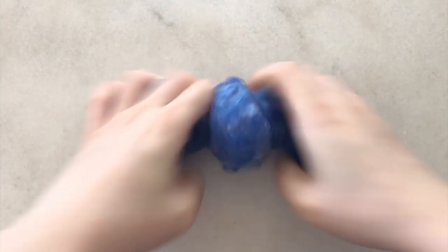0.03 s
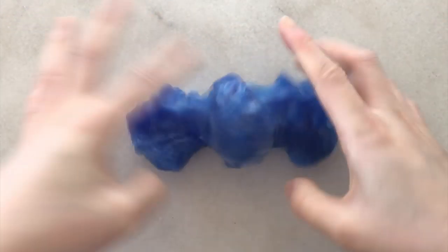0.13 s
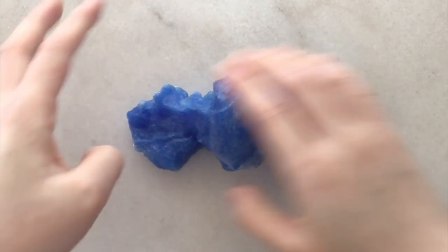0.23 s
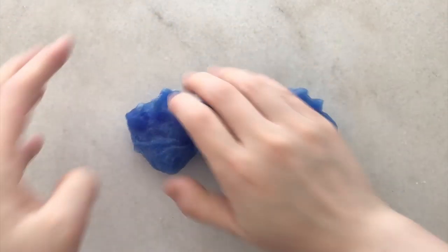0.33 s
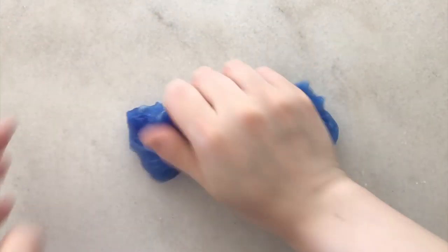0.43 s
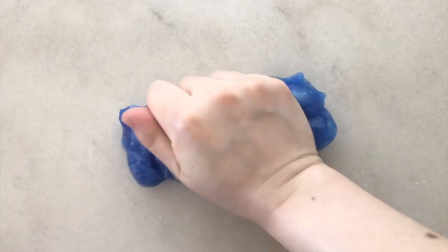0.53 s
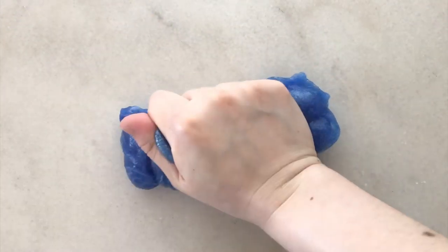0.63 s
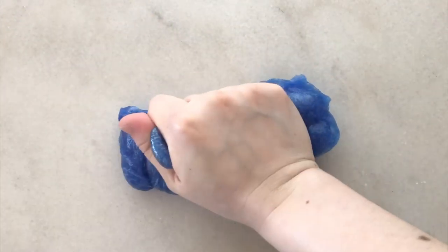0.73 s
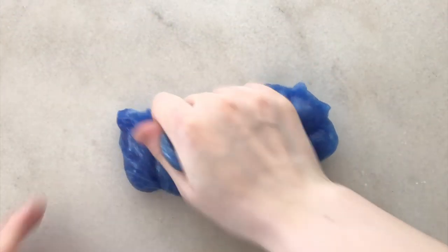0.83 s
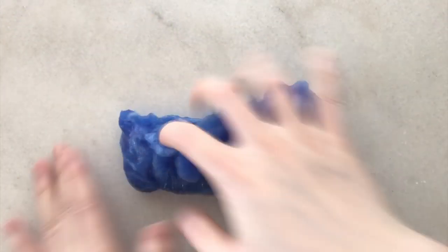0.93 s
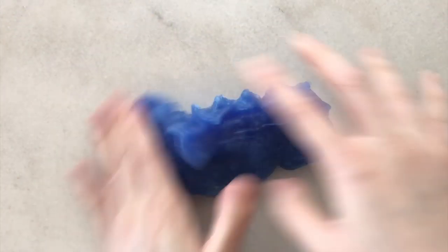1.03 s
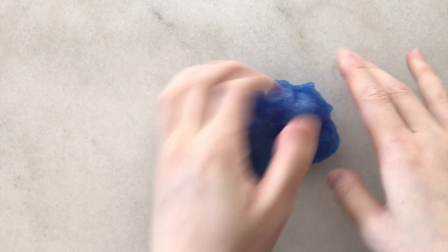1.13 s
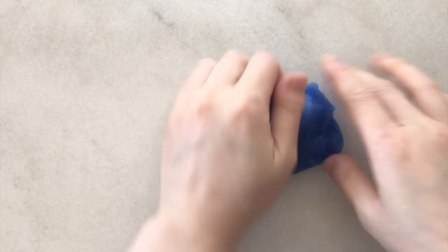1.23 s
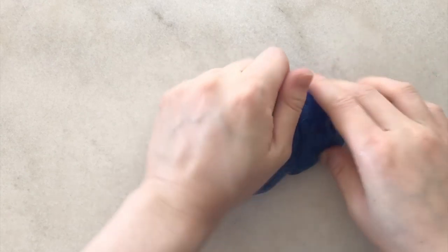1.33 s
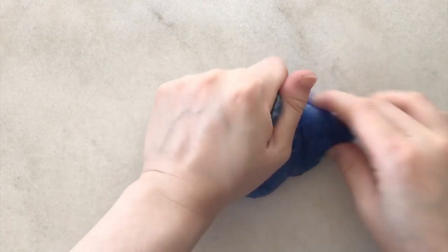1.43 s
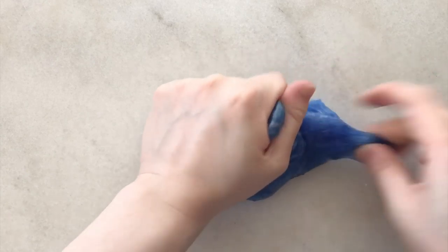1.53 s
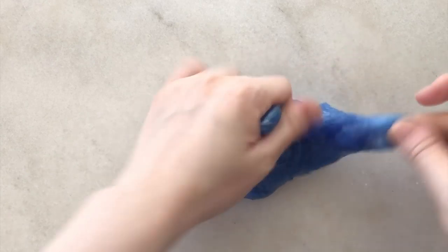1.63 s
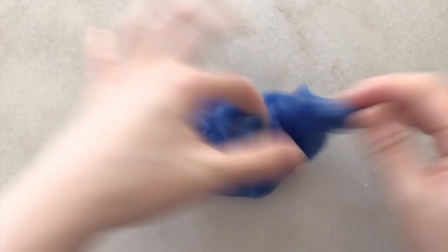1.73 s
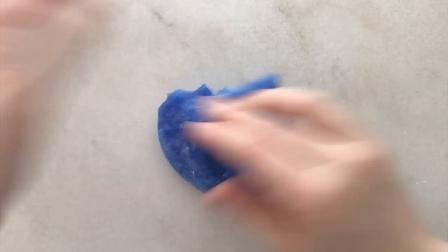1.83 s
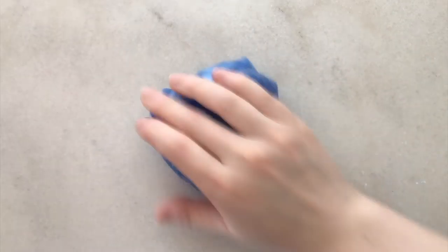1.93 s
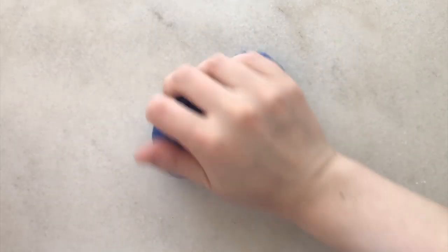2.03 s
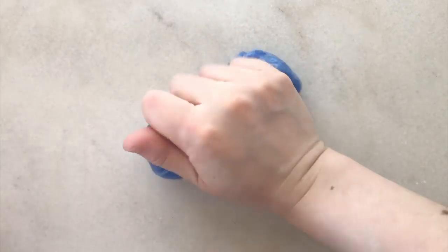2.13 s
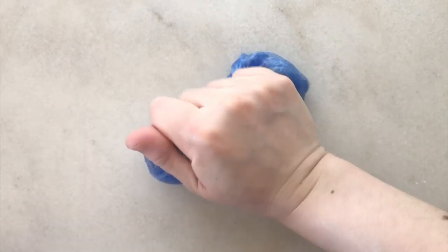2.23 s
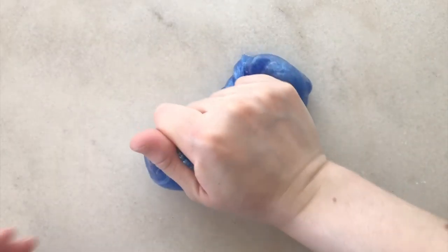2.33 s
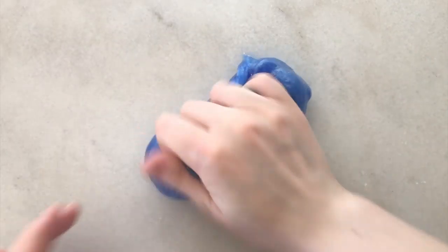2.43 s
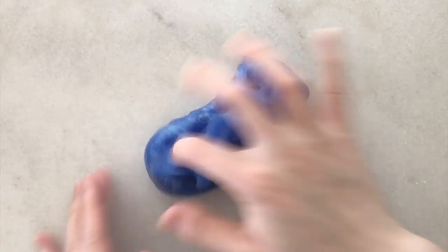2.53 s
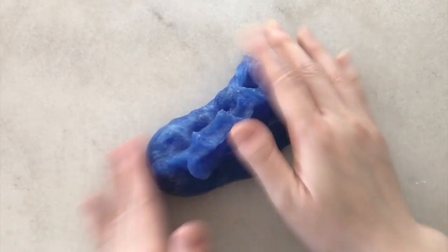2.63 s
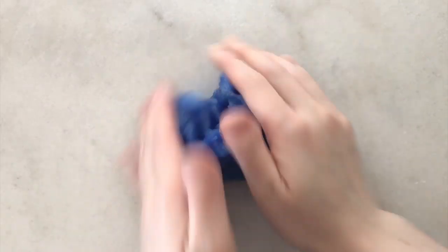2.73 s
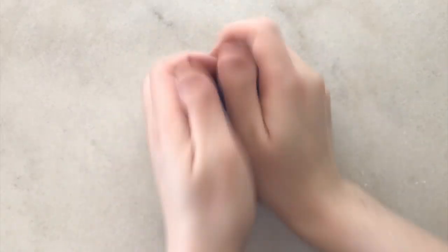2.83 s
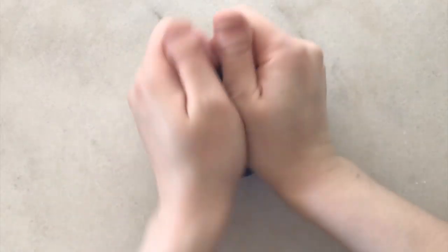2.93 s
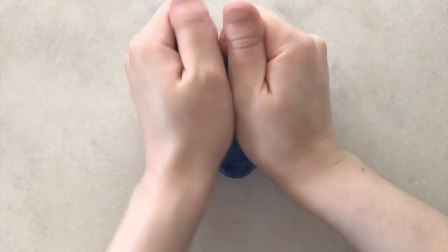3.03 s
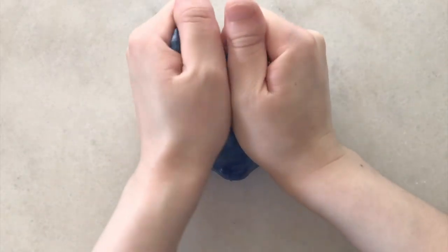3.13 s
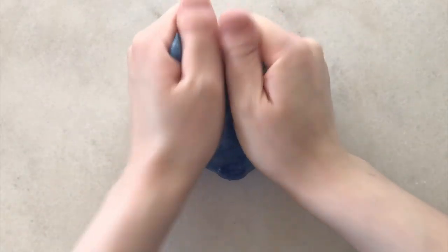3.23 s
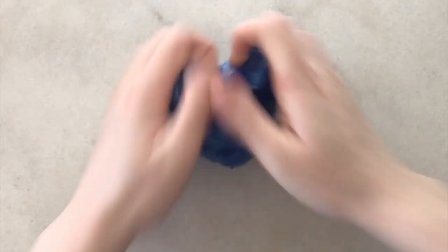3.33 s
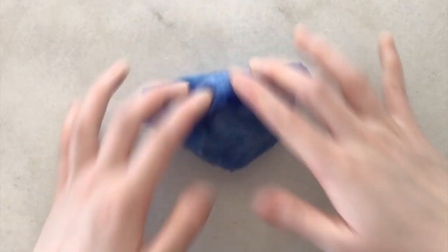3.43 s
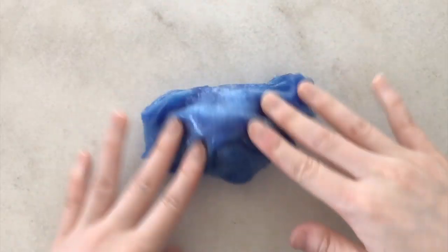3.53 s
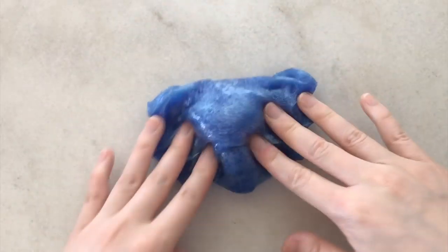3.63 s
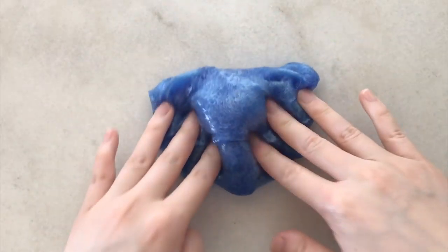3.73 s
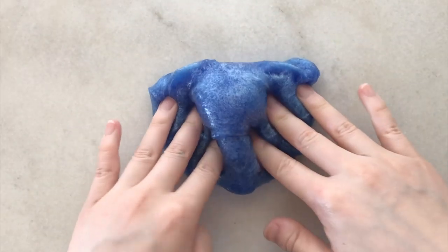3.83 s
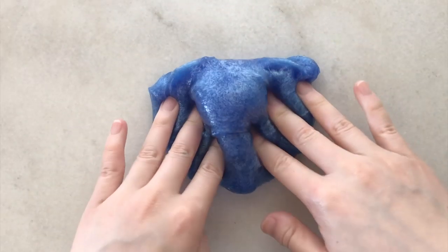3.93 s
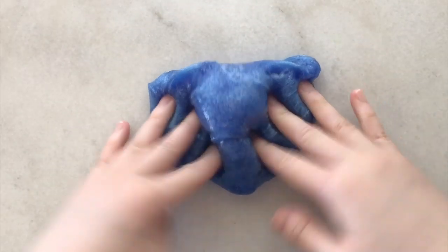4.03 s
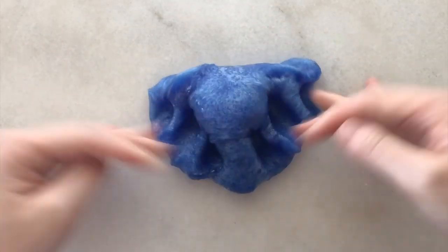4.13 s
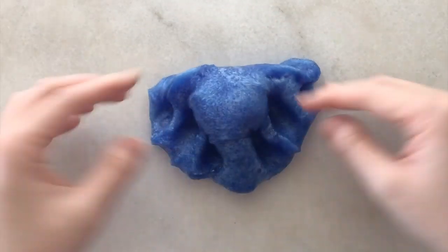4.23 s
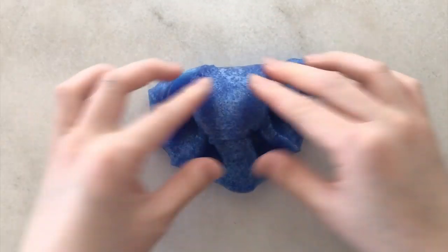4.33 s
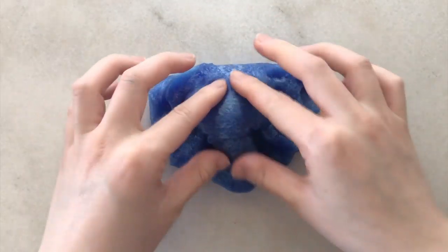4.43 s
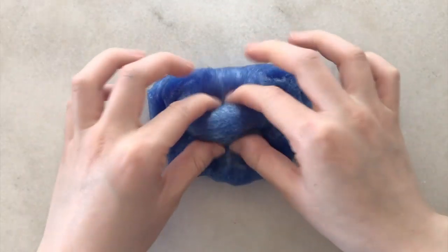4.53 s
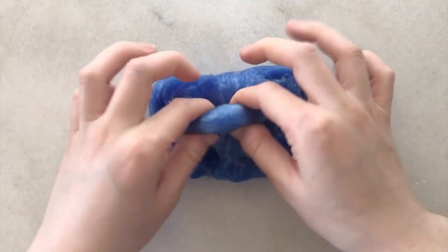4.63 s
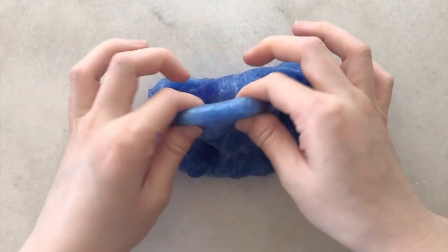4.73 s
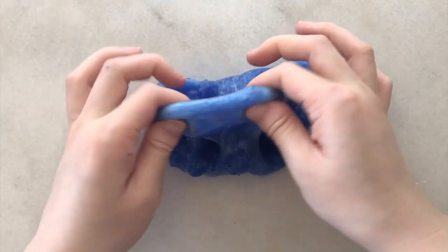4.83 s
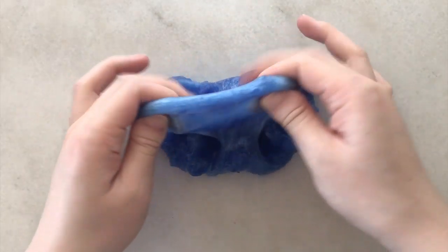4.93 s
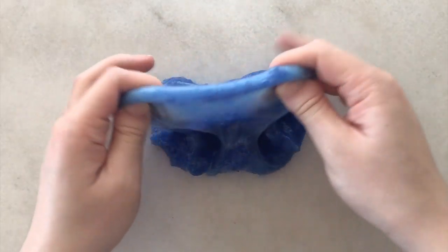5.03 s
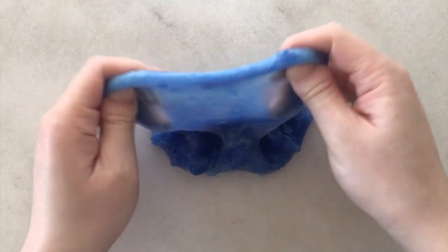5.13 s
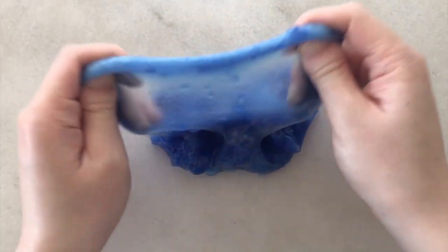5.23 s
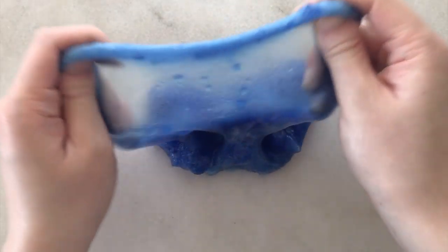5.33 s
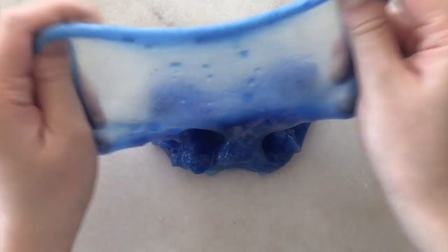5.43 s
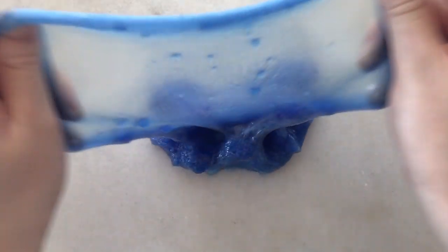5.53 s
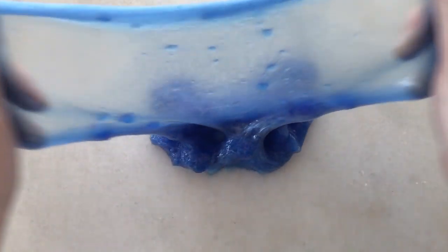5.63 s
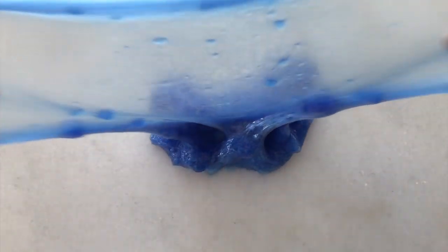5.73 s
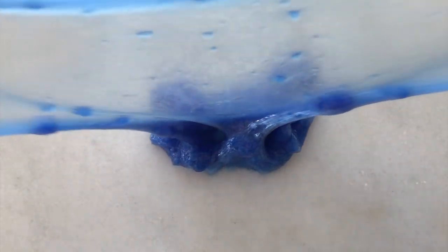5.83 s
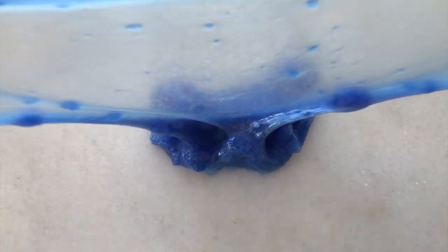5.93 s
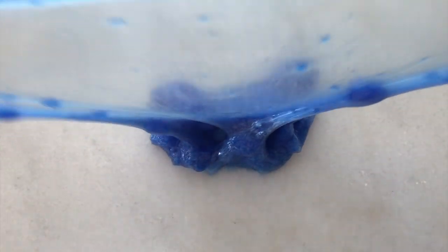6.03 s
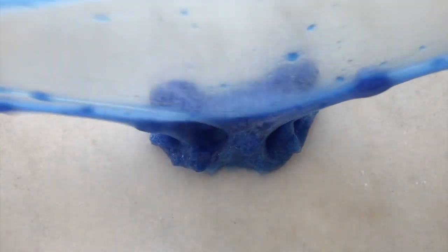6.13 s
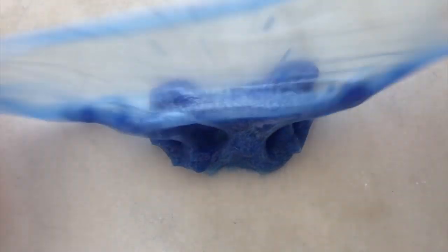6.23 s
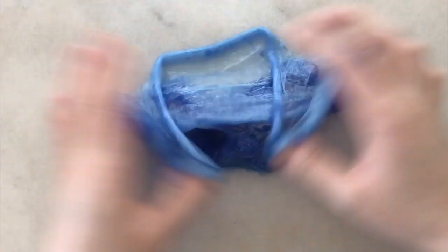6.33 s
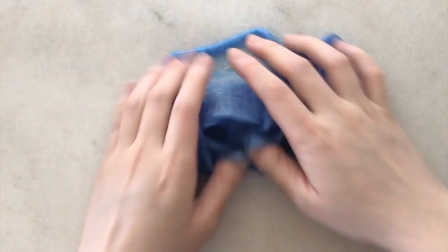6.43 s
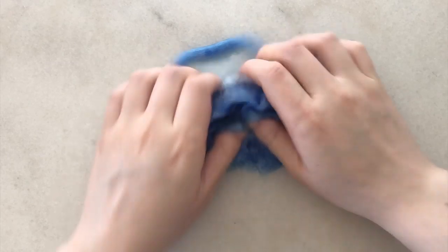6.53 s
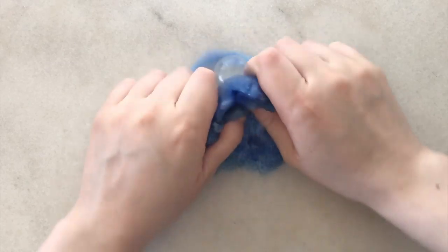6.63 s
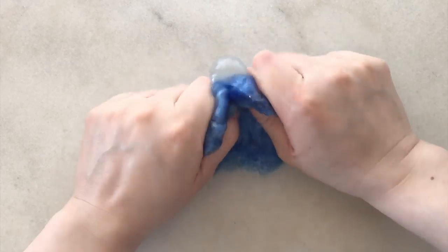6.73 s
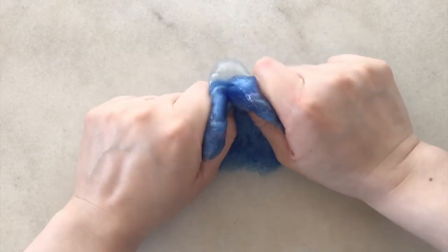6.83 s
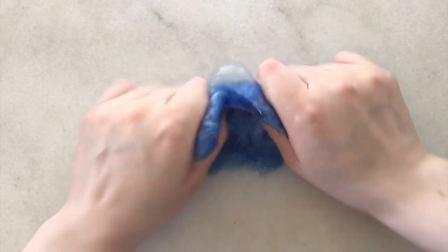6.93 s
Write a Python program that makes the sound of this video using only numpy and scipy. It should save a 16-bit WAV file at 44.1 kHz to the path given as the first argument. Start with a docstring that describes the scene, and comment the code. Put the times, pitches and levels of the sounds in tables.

```python
"""Wet squelches, sharp pops and a sticky crackle: hands knead slime on a stone counter in a small room.
Each pop is a few short rings with a noisy spatter; the crackle is thousands of tiny ringing clicks.
Bubbles are rough, rising tones. A room echo, rumble with faint hiss, and a far engine lie behind.
The engine is three wavering tones that slow down and speed up. The loudest pops overload the microphone."""
import sys
import numpy as np
from scipy import signal
from scipy.fft import rfft, irfft
from scipy.io import wavfile

SR = 44100
rng = np.random.default_rng(int(sys.argv[2]) if len(sys.argv) > 2 else 0)


def int16_out(signal):
    """Quantize to a 16-bit WAV file."""
    q = np.round(np.clip(np.atleast_2d(signal).T, -1, 1) * 32767)
    wavfile.write(sys.argv[1], SR, q.astype(np.int16))


N = 308700
TIME = np.arange(N) / SR   # seconds

# The clearest air pockets bursting. Each row: start in seconds, pitch of the opening in Hz, ring in dB,
# film snap in dB, hollow gulp in dB, knock in the slab in dB, spatter in dB against the first spike.
AIR_POCKET_POPS = [(0.0489, 5440, -10, -9, -35, -12.5, -1), (0.462, 3400, -13.5, -19, -29, -18.5, 4),
                   (0.5013, 3520, -8.5, -2.5, -11, -22.5, -7), (0.5474, 6300, 4.5, -7, -15, -14.5, 10),
                   (0.5918, 14300, -5, -2, -16, -28, -6), (0.5964, 14000, 9, 13.5, -20, -11.5, -5),
                   (0.6184, 12600, 10, 5.5, -17.5, -36, 6), (0.6283, 7700, 16, 2, 8.5, -8, 8),
                   (0.6666, 2800, 22, 10, 1, 0.5, -16), (0.6787, 4030, 7, 11.5, -2, -20, 3.5),
                   (0.6843, 13500, 6, -9, -16, -28, 2), (0.6965, 14100, 7, -2, -14, -14, -1),
                   (0.7647, 13800, -26, -1, -39, -39, -8), (0.7773, 14100, -15, -22, -8, -17.5, -9),
                   (0.7899, 9000, -15, -2.5, -41, -39, -3), (0.9216, 2000, -11, -11.5, -30, -13, 0),
                   (0.9375, 6200, -17, -14, -29, -7.5, 9), (1.1084, 2540, -20, -23, -48, -25.5, 6),
                   (1.1501, 8000, -19, -33, -23, -24, 2), (1.2214, 6640, 1, -8, -19.5, -23, -8.5),
                   (1.2834, 3300, -19.5, -14, -51, -53, 19), (1.3301, 6350, -11.5, -31, -35, -28, -4),
                   (1.3356, 2980, -14.5, -15, -21, -25, 17), (1.3895, 6500, 15.5, 8.5, -1, -11.5, -6.5),
                   (1.4223, 3190, -7, 5.5, -16, -21, -2), (1.451, 3150, 0.5, -15.5, -22, -17, -5),
                   (1.468, 3970, 4, 12, -32, -16, 8), (1.507, 7300, 9.5, 7, 2, -10, 0),
                   (1.5614, 11740, 16.5, 18.5, 0, -21, -3.5), (1.6057, 14000, -2, 4, -31, -31, -3),
                   (1.6166, 14500, 9, 2, -35, -42, -1.5), (1.6391, 14100, -3, -6, -40, -39, -9),
                   (1.989, 8200, -20.5, -18, -26.5, -50, 5.5), (2.0052, 6100, -23, -16, -46, -50, -4),
                   (2.0714, 14000, -4.5, -3, -21, -28, 11), (2.0975, 11600, 0, -18, -39, -22, 12),
                   (2.1347, 8400, -22, -19, -42, -20, -2), (2.1495, 8200, -15, -1, -35, -42, -4),
                   (2.1588, 3300, -7.5, -2, -52, -39, -10), (2.214, 9750, -20, -14.5, -43, -39, -4),
                   (2.2313, 8530, 18, 10.5, -18, -16.5, -28), (2.3035, 8730, -3, 10, -29, -11.5, 2.5),
                   (2.62, 8090, -21, -23, -39, -31.5, 10), (2.9204, 7240, -13, -8, -14, -44, 9.5),
                   (2.9288, 2900, -19, -14, -28, -19, 12), (3.037, 5960, -9.5, -11, -16, -40, 14),
                   (3.074, 6900, -4, -4, -14.5, -18.5, -1), (3.1024, 5600, -11.5, -24, -34, -39, -6),
                   (3.1273, 12000, -7, 2.5, -29, -21, -2), (3.1365, 4020, -3, -17, 1.5, -8.5, 3),
                   (3.1705, 6240, -10, -2, -20, -36, 11), (3.1851, 9000, 11, 3, -17.5, -32, -22),
                   (3.1936, 13500, 5, -3, -21, -24, -9), (3.2079, 8470, -13, 10.5, -18, -34, 0),
                   (3.2239, 10100, 24, 9, -14, -21, -27), (3.2374, 10000, 3, -12, -28, -38, -6),
                   (3.2602, 5660, 16, 12.5, -3.5, -17, -3.5), (3.274, 13100, 1, 1, -23, -26.5, 0),
                   (3.325, 6500, -3, -1.5, -27, -41, -2), (3.3389, 6460, -17, 0.5, -26, -33, -3),
                   (3.5686, 9000, -28, -19, -44.5, -50, 3.5), (3.6186, 7030, -29, -25, -32, -36, 2.5),
                   (3.7029, 13520, -24, -28.5, -51, -41.5, -12), (3.863, 5630, -31.5, -20, -34, -30, -13),
                   (4.0025, 3380, -31, -41.5, -34, -34.5, -2.5), (4.1209, 3550, -11, -7.5, -52, -9.5, 6),
                   (4.1324, 3600, -13, -10, -36, -23, 3), (4.1561, 4440, -3.5, 0, -43, -18, 1),
                   (4.193, 11100, -29, -7, -40.5, -19, -2), (4.2118, 2800, -21, -29, -36, -23, -1),
                   (4.554, 9140, -27.5, -29.5, -47, -44.5, -15),
                   (4.6598, 11100, -30, -39, -54, -43.5, -0.5), (5.0937, 6750, -36, -48, -42, -45.5, -0.5),
                   (5.3514, 14100, -34.5, -42, -58.5, -46.5, -2.5),
                   (5.4493, 2300, -36.5, -27.5, -54.5, -46.5, 0),
                   (5.6941, 13950, -30, -30, -53.5, -49.5, -5.5),
                   (5.747, 13880, -29.5, -23.5, -55.5, -43, -2.5),
                   (5.8339, 4310, -30.5, -29, -51.5, -43, 2), (6.1163, 7470, -32, -41, -42.5, -44.5, 2),
                   (6.3699, 3500, -2, -26, -17.5, -21.5, 3.5), (6.396, 4560, -25, -28, -24, -26, 15),
                   (6.595, 7680, -16.5, -9, -19.5, -40.5, -3), (6.6626, 3400, -15, -23, -16, -38, -6),
                   (6.693, 10600, -18, -8, -29, -36, 2), (6.724, 13100, 1.5, -2, -37, -23, -23),
                   (6.7445, 4700, 5.5, -11, 1.5, -5, -1), (6.7603, 11500, -10, -5, -15, -28.5, 4),
                   (6.7762, 8500, -17, -1, -30, -40, -10), (6.789, 9200, 9, 6, -32, -5.5, -10),
                   (6.7955, 6100, 3, 12.5, -27, -12, 9), (6.8151, 7830, 3, -9, 0, -18, 22),
                   (6.8199, 9000, 15.5, -1, -31, -25, -9), (6.8323, 8910, 11, -5, -29, -27, -1),
                   (6.8386, 7240, 8, -1, -16, -4, 21), (6.8738, 14900, 6.5, 7.5, -22, -21, 6),
                   (6.9017, 6400, -4.5, -2, -33, -22.5, -3)]
# The largest bubbles squeezed through the wet mass, with one low tone at the very start that belongs to a pop.
# Each row: start in seconds, starting pitch in Hz, # level in dB before the soft attack and the fading.
LARGE_BUBBLES = [(0.067, 686, -21.5), (0.067, 1470, -26.5), (0.125, 1310, -26), (0.924, 340, -28),
                 (0.966, 1029, -28), (0.967, 474, -29), (0.974, 1325, -22.5), (1.541, 1110, -29),
                 (1.695, 2320, -23.5), (1.726, 1880, -24), (1.77, 776, -29.5), (1.873, 2150, -35),
                 (2.514, 385, -25.5), (2.533, 410, -24.5), (2.539, 1207, -25), (2.623, 1120, -30.5),
                 (2.93, 2700, -29), (2.974, 2750, -39), (2.982, 2460, -34), (3.352, 496, -31.5),
                 (3.421, 1700, -36), (3.869, 193, -36), (3.902, 1253, -46.5), (4.126, 600, -26),
                 (4.163, 600, -25), (6.678, 2940, -23), (6.683, 2900, -26), (6.693, 1563, -18.5),
                 (6.702, 3350, -21)]
# A hand peels off the slime: wettest as it lets go, drier as the last threads part.
# Each row: moment of full strength in seconds, rise in seconds, hold in seconds,
# wet squelch in dB and fine fizz in dB (both before the trims in scene).
PEEL_STROKES = [(0.085, .11, .11, -31, -34), (0.94, .075, .1, -34.5, -37), (1.73, 0.1, .1, -32.5, -39),
                (2.528, 0.07, .105, -34, -43), (3.36, .09, 0.045, -41, -37), (3.42, 0.053, .07, -42, -44.5),
                (4.132, .048, .06, -35, -40.5), (6.375, 0.11, 0.027, -48.5, -49),
                (6.612, .085, .05, -39.5, -42), (6.675, .07, .11, -43, -44)]
# A hand presses into the slime and holds it. Each row: moment of full strength in seconds,
# rise in seconds, hold in seconds, wet squelch in dB and fine fizz in dB (both before the trims).
PRESS_STROKES = [(0.5, 0.16, 0.092, -52.5, -55.5), (0.645, 0.087, 0.06, -39, -28.5),
                 (0.76, .05, .02, -51.5, -43), (1.12, 0.1, .06, -52.5, -55), (1.32, .2, .03, -62, -57.5),
                 (1.42, 0.057, .18, -44.5, -35.5), (1.93, .13, .06, -57.5, -54.5),
                 (2.1, 0.15, .06, -52, -52), (2.26, 0.1, .07, -54.5, -40.5), (2.8, .2, .08, -60, -62.5),
                 (2.93, 0.13, 0.012, -47.5, -49), (3.08, .15, .08, -51.5, -45.5),
                 (3.21, 0.13, 0.06, -46, -32), (3.57, 0.091, 0.017, -60.5, -58.5),
                 (4.68, .12, .03, -62.5, -61.5), (4.95, .6, 0.22, -68.5, -75),
                 (6.2, 0.37, .045, -65, -58.5), (6.47, .1, .07, -57, -63), (6.85, 0.18, 0.022, -43, -25.5),
                 (6.95, 0.069, 0.055, -52.5, -50)]
# The sheet is pulled thin and crackles faintly. Each row: time in seconds, fizz level in dB before the trims.
STRETCH_LEVEL = [(4.5, -94), (4.8, -78.5), (5.2, -67.5), (5.7, -68.5), (5.95, -71.5), (6.3, -70),
                 (6.5, -87)]
# Tone colour of the wet squelch. Each row: pitch in Hz, strength in dB per Hz.
SQUELCH_COLOUR = [(150, -17), (300, -0.5), (500, -2), (900, -3.5), (1500, -2.5), (2500, -8.5), (4000, -9),
                  (8000, -20), (16000, -46)]
# Tone colour of the fine fizz. Each row: pitch in Hz, strength in dB per Hz.
FIZZ_COLOUR = [(1000, -23), (2500, -9.5), (4000, -2.5), (7000, -1), (11000, -2.5), (16000, 0)]
# Threads breaking in the squelch. The row: count per second at rest, count added at the reference level.
SQUELCH_THREADS = (1100, 5500)
# Threads breaking in the fizz. The row: count per second at rest, count added at the reference level.
FIZZ_THREADS = (900, 7000)
# Air between the cupped hands and the counter. Each row: pitch in Hz, cycles of ring, level in dB.
HAND_HOLLOW = [(1870, 69, -8), (2505, 35, -1.5), (2950, 5, -9), (6777, 53, -6)]
# Strength of the room's answer. Each row: pitch in Hz, weight in dB given to that band.
ROOM_WEIGHT = [(200, -10.5), (600, -15), (2000, -15.5), (6000, -13.5), (10000, -13), (16000, -13.5)]
# How long the room rings. Each row: pitch in Hz, seconds to die away by 60 dB.
ROOM_DECAY = [(200, 0.12), (2000, 0.17), (8000, 0.11), (16000, 0.11)]
# Tone colour of the background. Each row: pitch in Hz, relative strength in dB.
ROOM_TONE_COLOUR = [(15, -42), (25, -29.5), (59, 1.5), (108, 0), (145, -2.5), (335, -11), (373, -11),
                    (677, -18.5), (911, -20.5), (2110, -28.5), (2840, -32), (3520, -28), (3920, -31.5),
                    (4490, -31.5), (16000, -36.5)]
# Distant engine, easing off and pulling again. Each row: time in seconds, turns per second in Hz,
# third, fourth and sixth order in dB (before the waver).
ENGINE_RUN = [(3.25, 67.1, -91.5, -69, -89.5), (3.45, 69.3, -79.5, -63.5, -78),
              (3.87, 75.2, -79.5, -63.5, -76.5), (4.0, 72, -85, -81.5, -85.5),
              (4.5, 57.5, -87, -79.5, -85.5), (4.9, 62.88, -77.5, -67, -70.5), (5.45, 61.5, -75, -84, -80),
              (5.62, 62.9, -79.5, -61, -65.5), (5.78, 66.26, -72, -57, -62.5), (5.88, 68.4, -73, -71, -72),
              (5.98, 69.3, -65, -57, -65), (6.25, 74.5, -60, -67.5, -71.5), (6.39, 75.1, -56.5, -58, -81.5),
              (6.58, 73, -62, -71.5, -67.5), (6.8, 67, -73, -83, -84)]

REFERENCE_DB = -40   # squelch or fizz level at which the counts and levels of small events are given
RING_S = 0.00042   # cycles of ring = pitch times this, but never fewer than one
RISE_DB = 30   # how far a stroke climbs over its rise time
PEEL_WET_SAG_DB_PER_S, PEEL_FIZZ_SAG_DB_PER_S, PEEL_RELEASE_DB_PER_S = 185, 100.5, 599.5
PRESS_WET_SAG_DB_PER_S, PRESS_FIZZ_SAG_DB_PER_S, PRESS_RELEASE_DB_PER_S = 40.5, 17, 259
STRETCH_WET_DB = -1   # squelch of the sheet against its fizz
RESTING_DB = -80.5   # crackle of slime that only settles, before the trims

# Smaller pockets burst at random, more often and louder the harder the slime is worked.
SMALL_POPS_PER_S, SMALL_POP_DB, SMALL_POP_SPREAD_DB = 24, -15.5, 3.5
SMALL_POP_RATE_FOLLOWS, SMALL_POP_LEVEL_FOLLOWS = .25, .6   # shares of the fizz's swing in dB
SMALL_POP_LOW_HZ, SMALL_POP_HIGH_HZ = 2600, 14000
SMALL_SNAP_DB, SMALL_GULP_DB, SMALL_KNOCK_DB = 1.5, -13.5, -16   # against the ring
SMALL_SPATTER_DB = 5   # against the first spike
SMALL_POP_SLACK_DB = -56   # below this fizz level the slime grows too slack to burst often

# Lesser bubbles come at random, more and louder with wetter strokes.
SMALL_BUBBLES_PER_S, SMALL_BUBBLE_DB, SMALL_BUBBLE_SPREAD_DB = 53, -35.5, 2
SMALL_BUBBLE_LOW_HZ, SMALL_BUBBLE_HIGH_HZ = 1090, 3300
# Fading time in seconds at 1 kHz; lower bubbles ring longer by this power of the pitch.
BUBBLE_DECAY_S, BUBBLE_DECAY_SLOPE = 0.0034, 0.19
BUBBLE_ROUGHNESS = .5

ROOM_TONE_DB = -58
CUTOFF_HZ = 16200   # treble above this is cut


def from_db(db):
    """Decibels to gain."""
    return 10 ** (np.asarray(db) / 20)


def rms_one(x):
    """Scale to an average (rms) level of 1."""
    return x / np.sqrt(np.mean(x ** 2) + 1e-20)


def unit_energy(x):
    """Scale a short pulse to energy 1."""
    return x / np.sqrt(np.sum(x ** 2) + 1e-20)


def in_time(rows):
    """Draw one smooth-running curve for each column after the time column."""
    s, *columns = np.transpose(rows)
    return [np.interp(TIME, s, c) for c in columns]


def at_hz(points, hz):
    """Read a two-column table at a pitch, spacing pitches by ratio as the ear does."""
    table_hz, values = np.transpose(points)
    return np.interp(np.log(hz + 1e-9), np.log(table_hz), values)


def butter(x, order, hz, kind):
    """Keep one part of the pitch range with a Butterworth filter."""
    edges = np.minimum(hz, SR / 2 - 100)
    return signal.sosfilt(signal.butter(order, edges, kind, fs=SR, output="sos"), x + 1e-18)


def resonate(x, hz, q):
    """A damped resonance that rings for about q cycles."""
    r = np.exp(-np.pi * hz / q / SR)
    feedback = [1, -2 * r * np.cos(2 * np.pi * hz / SR), r * r]
    return signal.lfilter([1 - r, 0, r - 1], feedback, x + 1e-18)


def chance_events(per_s, level_db, spread_db, low_hz, high_hz, count=2000):
    """Rows of seconds, Hz and dB at random moments; their rate and level follow two curves."""
    when, luck, pitch, size = rng.random((count, 4)).T
    at = (when * N).astype(int)
    hz = low_hz * (high_hz / low_hz) ** pitch
    db = level_db[at] + spread_db * np.log(size / (1 - size)) / 2
    rows = np.transpose([at / SR, hz, db])
    return rows[luck < per_s[at] * N / SR / count]


def strokes(rows, wet_sag, fizz_sag, release):
    """Gains of squelch and fizz: each stroke swells, sags and dies away (slopes in dB per second)."""
    wet = fizz = 0
    for s, rise_s, hold_s, wet_db, fizz_db in rows:
        held = np.maximum(TIME - s, 0)
        rise_db = -RISE_DB * np.maximum(s - TIME, 0) / rise_s
        shape_db = rise_db - release * np.maximum(held - hold_s, 0)
        wet = wet + from_db(np.maximum(wet_db + shape_db - wet_sag * held, -200))
        fizz = fizz + from_db(np.maximum(fizz_db + shape_db - fizz_sag * held, -200))
    return wet, fizz


def handwork():
    """Levels in dB of wet squelch and fine fizz as the hands peel, press and stretch."""
    peel_wet, peel_fizz = strokes(
        PEEL_STROKES, PEEL_WET_SAG_DB_PER_S, PEEL_FIZZ_SAG_DB_PER_S, PEEL_RELEASE_DB_PER_S)
    press_wet, press_fizz = strokes(
        PRESS_STROKES, PRESS_WET_SAG_DB_PER_S, PRESS_FIZZ_SAG_DB_PER_S, PRESS_RELEASE_DB_PER_S)
    sheet = np.hypot(from_db(in_time(STRETCH_LEVEL)[0]), from_db(RESTING_DB))
    # Separate rustles add up by their power, which is gain squared.
    wet_power = peel_wet ** 2 + press_wet ** 2 + (from_db(STRETCH_WET_DB) * sheet) ** 2
    fizz_power = peel_fizz ** 2 + press_fizz ** 2 + sheet ** 2
    return 10 * np.log10(wet_power), 10 * np.log10(fizz_power)


def crackle(colour, per_s, spread_db, q, count=30):
    """Tiny threads and bubbles break at random, each ringing briefly at one of 30 pitches; rms 1."""
    sizes = from_db(spread_db * np.minimum(rng.exponential(1, N), 4)) * rng.choice([-1, 1], N)
    # Dividing by the rate's root keeps the level even, however many clicks there are.
    clicks = sizes * (rng.random(N) < per_s / SR) / np.sqrt(per_s)
    dealt = rng.integers(0, count, N)   # which pitch each click gets
    total = 0
    for k, hz in enumerate(np.geomspace(colour[0][0], colour[-1][0], count)):
        ringing = rms_one(resonate(clicks * (dealt == k), hz, q))
        total = total + from_db(at_hz(colour, hz)) * np.sqrt(hz) * ringing
    return rms_one(total)


def kneading(squelch_db, fizz_db, squelch_gain_db, fizz_gain_db):
    """Slime peels from skin and stone: the faster it peels, the more threads break each second."""
    squelch_rest, squelch_added = SQUELCH_THREADS
    fizz_rest, fizz_added = FIZZ_THREADS
    squelch_per_s = squelch_rest + squelch_added * from_db((squelch_db - REFERENCE_DB) / 2)
    fizz_per_s = fizz_rest + fizz_added * from_db((fizz_db - REFERENCE_DB) / 2)
    squelch = crackle(SQUELCH_COLOUR, squelch_per_s, spread_db=4.0, q=7.5)
    fizz = crackle(FIZZ_COLOUR, fizz_per_s, spread_db=4.5, q=2.0)
    return from_db(squelch_db + squelch_gain_db) * squelch + from_db(fizz_db + fizz_gain_db) * fizz


def slab_chirp(t, start_hz, glide_s, decay_s):
    """Bending waves in stone run faster the higher they are, so a knock arrives as a falling chirp."""
    phase = 2 * np.pi * start_hz * t / (1 + t / glide_s)
    return unit_energy(t * np.exp(-t / decay_s) * np.sin(phase))


def pops(rows, snap_hz, gulp_low_hz, gulp_high_hz, spatter_s, echo_s, echo_db):
    """The film snaps, the opening and the hollow behind it ring, and the torn rim spatters for a few ms."""
    t = TIME[:1024]
    spike = 1.0 * (t == 0)
    snap = unit_energy(butter(spike, 1, snap_hz, "high"))
    gulp = unit_energy(butter(spike, 2, [gulp_low_hz, gulp_high_hz], "band"))
    knock = slab_chirp(t, start_hz=2800, glide_s=0.002674, decay_s=0.0018)
    echo = from_db(echo_db) * np.sinc((t - echo_s) * SR)   # off the counter, just behind the direct sound
    fade = (1 - np.exp(-(t / 0.00098) ** 2)) * np.exp(-(t / spatter_s) ** 1.3)
    out = np.zeros(N + len(t))
    for row, grit in zip(rows, rng.standard_normal(size=(400, len(t)))):
        s, hz, ring_db, snap_db, gulp_db, knock_db, spatter_db = row
        ring = unit_energy(resonate(spike, hz, max(hz * RING_S, 1)))
        burst = from_db(ring_db) * ring + from_db(snap_db) * snap + from_db(gulp_db) * gulp
        spatter = unit_energy(np.convolve(burst, grit * fade)[:len(t)])
        pop = unit_energy(burst) + from_db(spatter_db) * spatter
        pop = unit_energy(pop + np.convolve(pop, echo)[:len(t)])
        strength = np.linalg.norm(from_db([ring_db, snap_db, gulp_db]))
        at = int(s * SR)
        out[at:at + len(t)] += strength * pop + from_db(knock_db) * knock
    return out[:N]


def small_pops(fizz_db):
    """Rows for small air pockets, which burst more often and louder the harder the slime is worked."""
    effort_db = fizz_db - REFERENCE_DB
    slackness = from_db(SMALL_POP_SLACK_DB - fizz_db) ** 2
    per_s = SMALL_POPS_PER_S * from_db(SMALL_POP_RATE_FOLLOWS * effort_db) / (1 + slackness)
    level_db = SMALL_POP_DB + SMALL_POP_LEVEL_FOLLOWS * effort_db
    rows = chance_events(per_s, level_db, SMALL_POP_SPREAD_DB, SMALL_POP_LOW_HZ, SMALL_POP_HIGH_HZ)
    return [(s, hz, db, db + SMALL_SNAP_DB, db + SMALL_GULP_DB, db + SMALL_KNOCK_DB, SMALL_SPATTER_DB)
            for s, hz, db in rows]


def bubbles(rows, rise_per_s, attack_s, rough):
    """Each bubble is a fading tone that climbs a little; its sticky wall gives way in jerks and roughens it."""
    t = TIME[:SR // 20]
    out = np.zeros(N + len(t))
    for (s, hz, db), jerks in zip(rows, rng.standard_normal(size=(200, 2, len(t)))):
        decay_s = BUBBLE_DECAY_S * (1000 / hz) ** BUBBLE_DECAY_SLOPE
        phase = 2 * np.pi * hz * (t + rise_per_s * t ** 2 / 2)
        swell, wobble = rough * rms_one(butter(jerks, 1, hz / 4, "low"))
        tone = (1 + swell) * np.sin(phase + wobble) / np.sqrt(1 + rough ** 2)
        at = int(s * SR)
        out[at:at + len(t)] += from_db(db) * (1 - np.exp(-t / attack_s)) * np.exp(-t / decay_s) * tone
    return out[:N]


def small_bubbles(squelch_db):
    """Rows for lesser bubbles: the wetter the stroke, the more and the louder they are."""
    wetness_db = squelch_db - REFERENCE_DB
    per_s = SMALL_BUBBLES_PER_S * from_db(wetness_db / 2)
    return list(chance_events(per_s, SMALL_BUBBLE_DB + wetness_db, SMALL_BUBBLE_SPREAD_DB,
                              SMALL_BUBBLE_LOW_HZ, SMALL_BUBBLE_HIGH_HZ))


def hand_hollow(x):
    """The air under the cupped hands rings at a few pitches of its own."""
    return sum(from_db(db) * resonate(x, hz, q) for hz, q, db in HAND_HOLLOW)


def room(x, gap_s, early_db):
    """The walls answer mainly after a short gap, as noise that fades at its own speed in each band."""
    t = TIME[:SR // 2]
    edges = np.geomspace(150, 18000, 12)
    white = rng.standard_normal((2, len(t)))
    arrival = np.where(t > gap_s, 1, from_db(early_db)) * (t > .002)
    response = 0
    for k, band in enumerate(zip(edges, edges[1:])):
        hz = np.sqrt(band[0] * band[1])   # middle of the band
        decay = unit_energy(arrival * 1000 ** (-t / at_hz(ROOM_DECAY, hz)))
        noise = butter(white[k % 2], 2, band, "band")
        response = response + from_db(at_hz(ROOM_WEIGHT, hz)) * decay * noise
    return signal.fftconvolve(x, response)[:N]


def engine(waver_db):
    """Three low orders (multiples of the turning rate) come through the walls, wavering in level."""
    hz, *levels = in_time(ENGINE_RUN)
    turn = 2 * np.pi * np.cumsum(hz) / SR
    waver = from_db(waver_db * rms_one(butter(rng.standard_normal(N), 2, 12, "low")))
    tones = sum(from_db(db) * np.sin(k * turn) for k, db in zip((3, 4, 6), levels))
    return waver * np.sqrt(2) * tones


def room_tone():
    """Low rumble of the house and street with a faint hiss, made by colouring steady noise."""
    colour = from_db(at_hz(ROOM_TONE_COLOUR, np.fft.rfftfreq(N, 1 / SR)))
    noise = irfft(rfft(rng.standard_normal(N)) * colour, N)
    return from_db(ROOM_TONE_DB) * rms_one(noise)


def scene():
    """Slime close by, the room around it, an engine outside."""
    squelch_db, fizz_db = handwork()
    slime = pops(AIR_POCKET_POPS + small_pops(fizz_db), snap_hz=8960, gulp_low_hz=1300,
                 gulp_high_hz=2700, spatter_s=0.0023, echo_s=0.0034, echo_db=-22.0)
    slime = slime + kneading(squelch_db, fizz_db, squelch_gain_db=-2.5, fizz_gain_db=-2.0)
    slime = slime + hand_hollow(slime)
    slime = slime + bubbles(LARGE_BUBBLES + small_bubbles(squelch_db), rise_per_s=4.0,
                            attack_s=0.0012, rough=BUBBLE_ROUGHNESS)
    walls = room(slime, gap_s=.009, early_db=-9)
    return (slime + walls + room_tone() + engine(waver_db=2.5))[None]


def record(dry):
    """The microphone flattens the loudest spikes, then the highest treble is cut."""
    clipped = dry / (1 + dry ** 6) ** (1 / 6)
    treble_cut = signal.cheby2(16, 70, CUTOFF_HZ + 600, fs=SR, output="sos")
    return signal.sosfilt(treble_cut, clipped)


dry = scene()
out = record(dry)
int16_out(out)
```